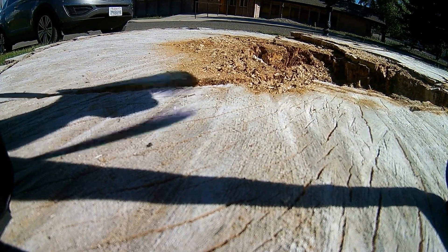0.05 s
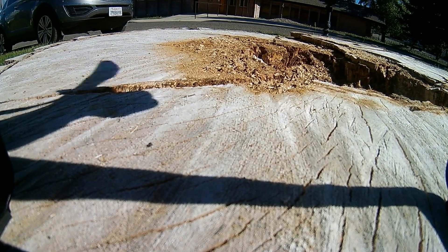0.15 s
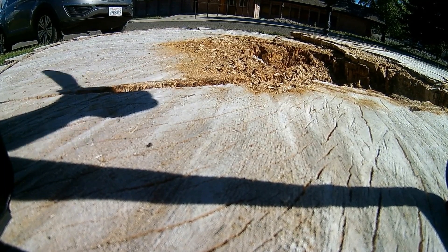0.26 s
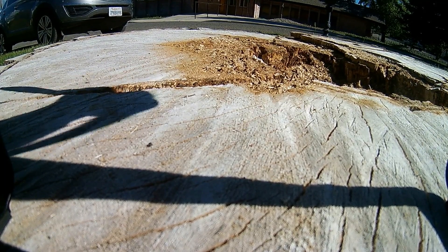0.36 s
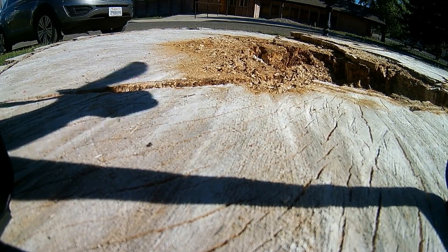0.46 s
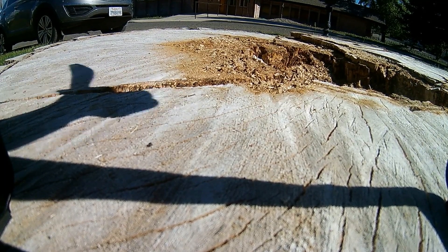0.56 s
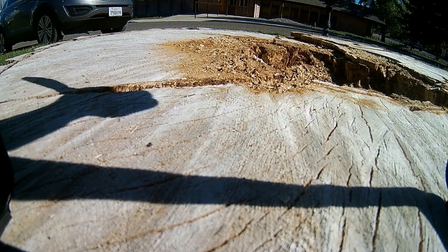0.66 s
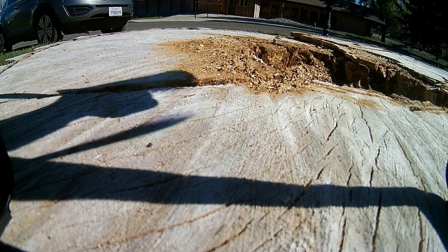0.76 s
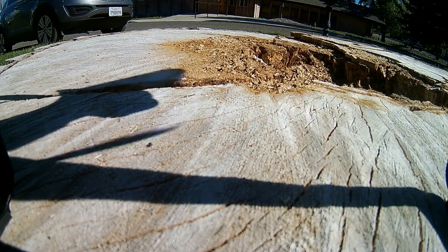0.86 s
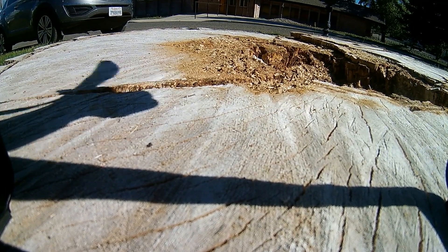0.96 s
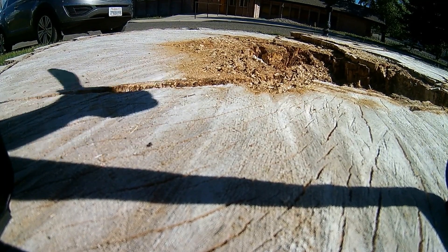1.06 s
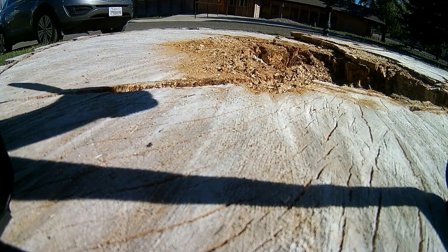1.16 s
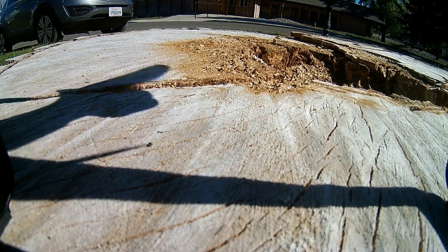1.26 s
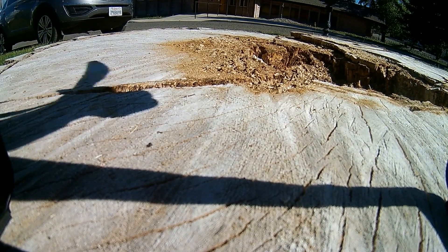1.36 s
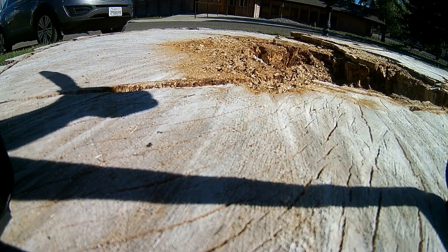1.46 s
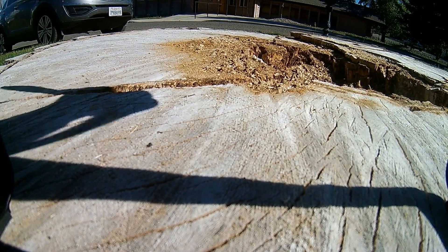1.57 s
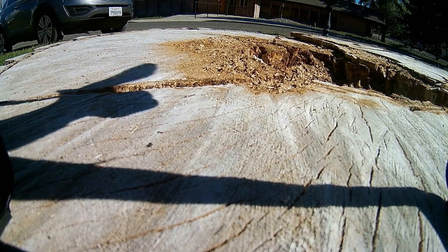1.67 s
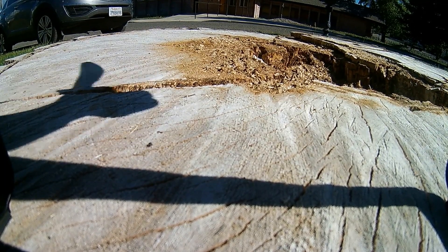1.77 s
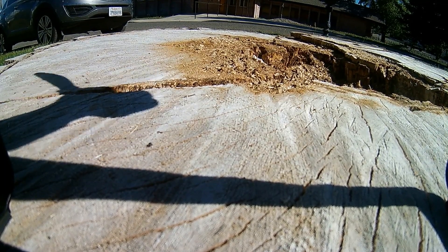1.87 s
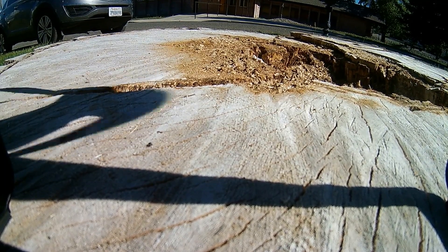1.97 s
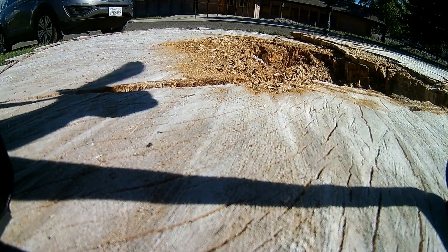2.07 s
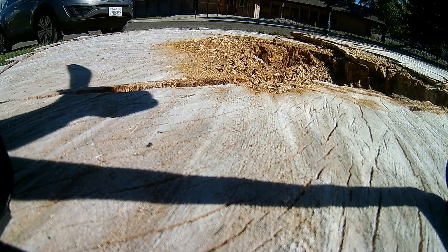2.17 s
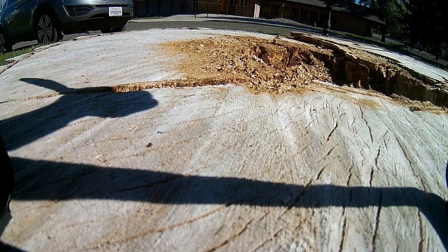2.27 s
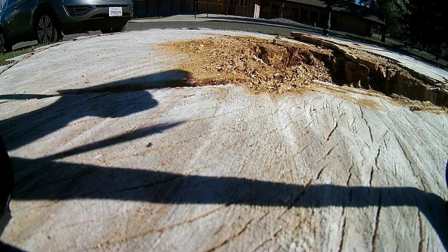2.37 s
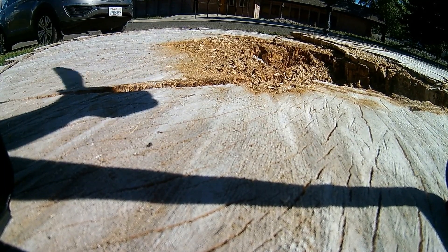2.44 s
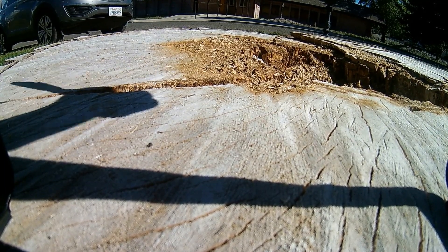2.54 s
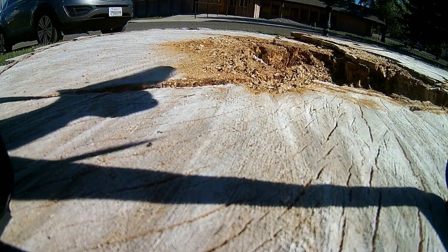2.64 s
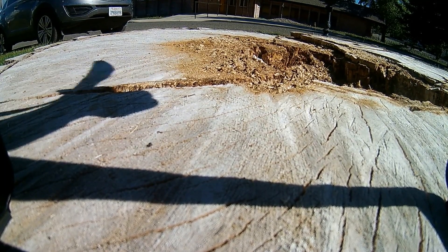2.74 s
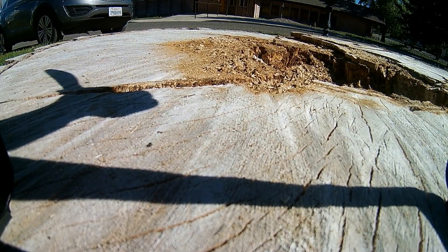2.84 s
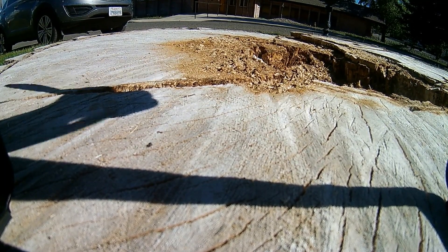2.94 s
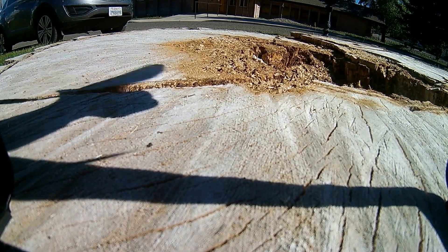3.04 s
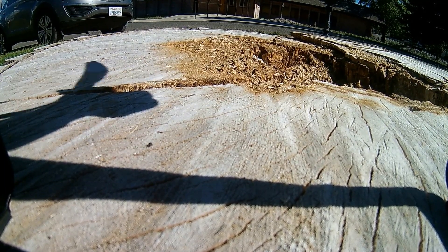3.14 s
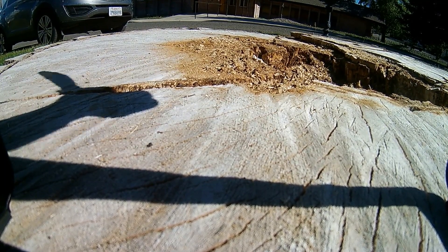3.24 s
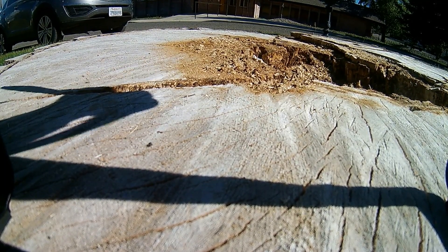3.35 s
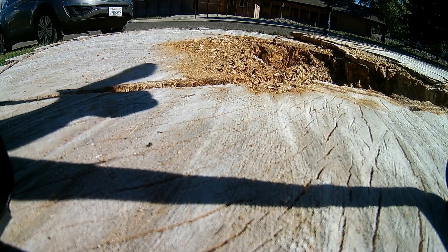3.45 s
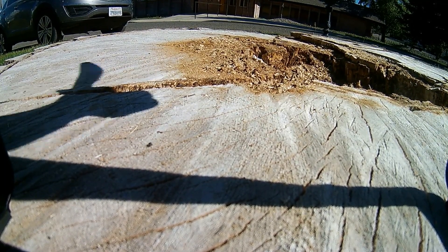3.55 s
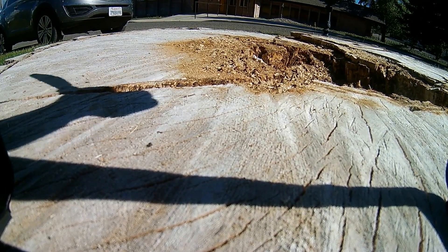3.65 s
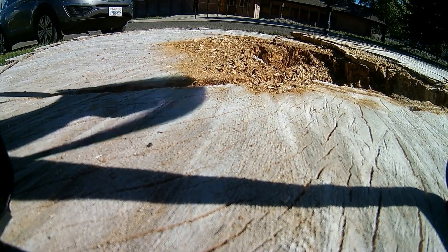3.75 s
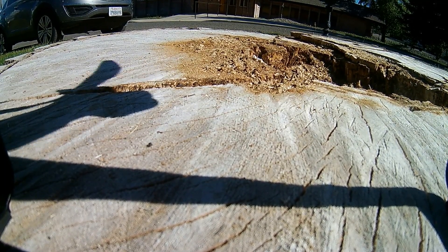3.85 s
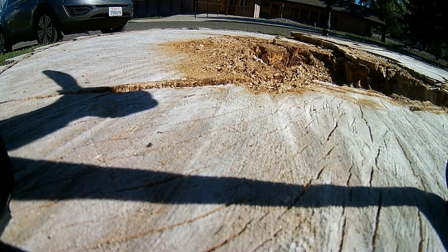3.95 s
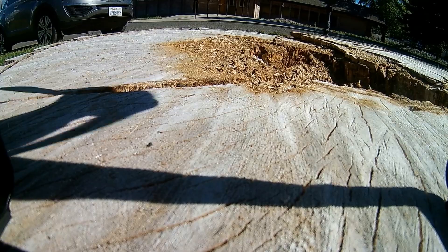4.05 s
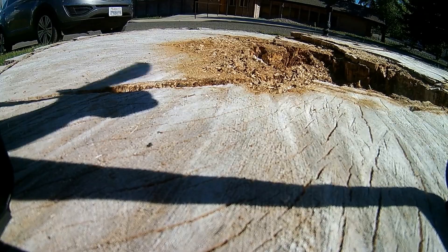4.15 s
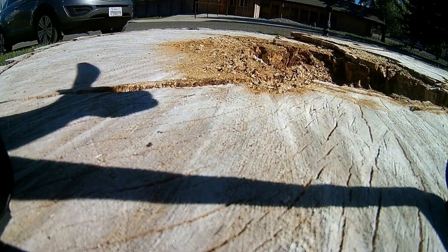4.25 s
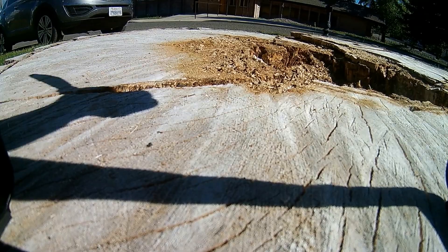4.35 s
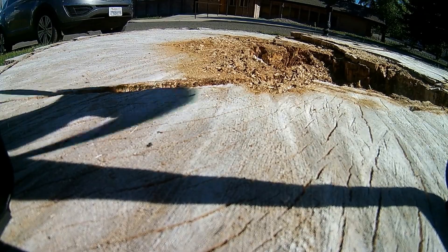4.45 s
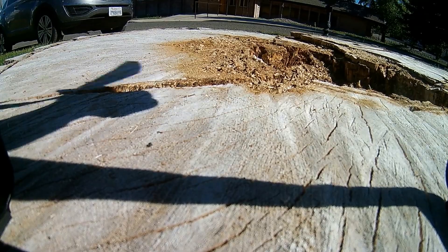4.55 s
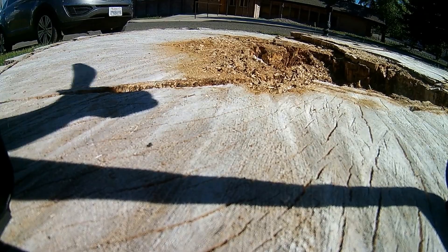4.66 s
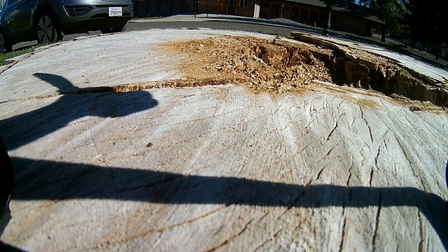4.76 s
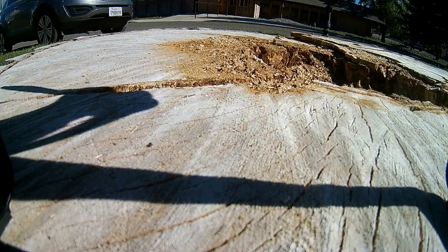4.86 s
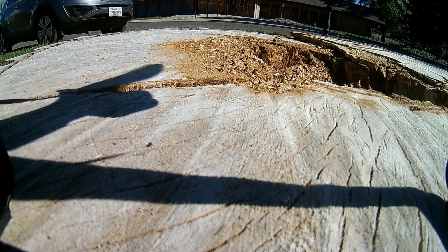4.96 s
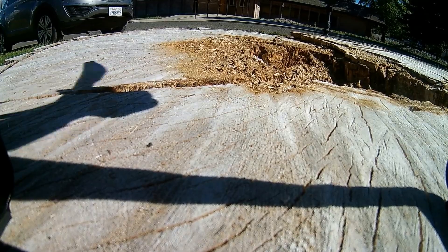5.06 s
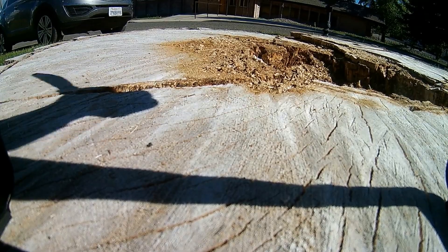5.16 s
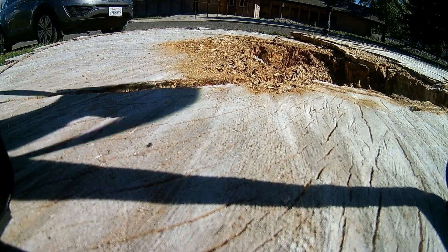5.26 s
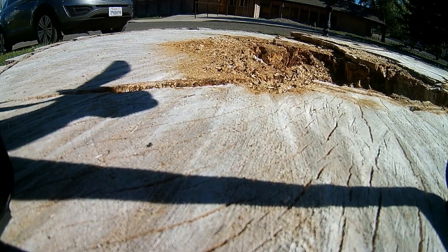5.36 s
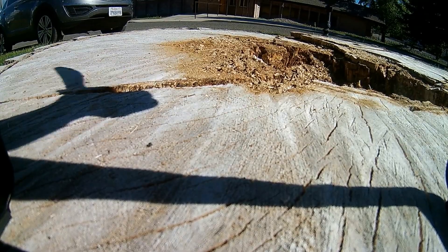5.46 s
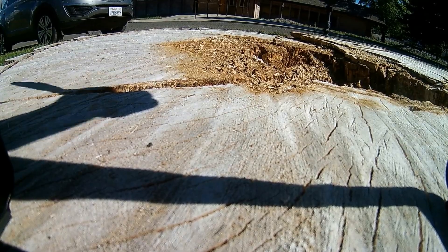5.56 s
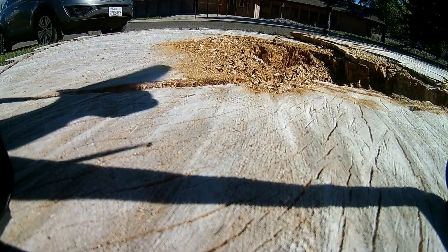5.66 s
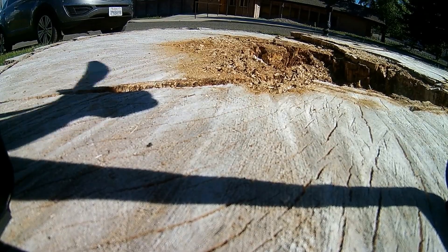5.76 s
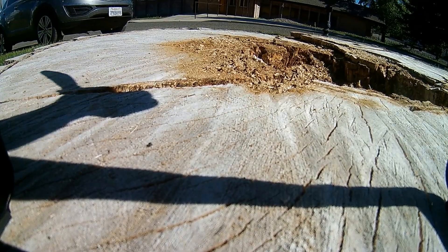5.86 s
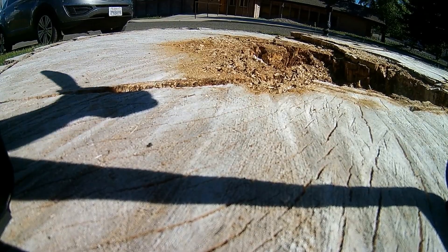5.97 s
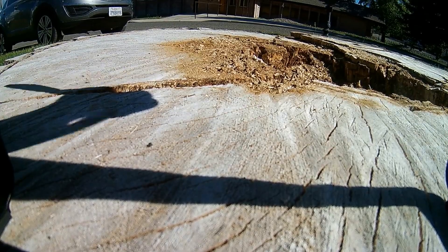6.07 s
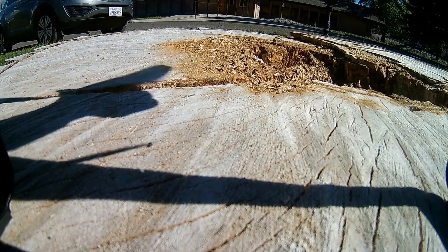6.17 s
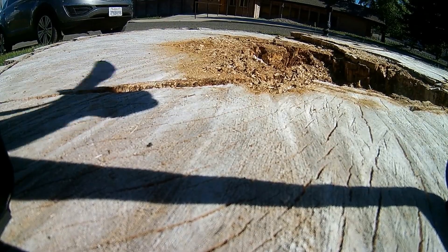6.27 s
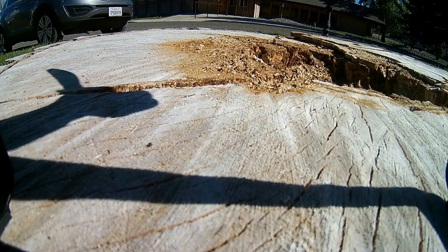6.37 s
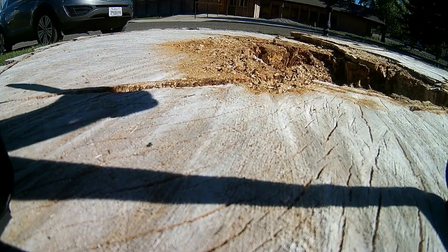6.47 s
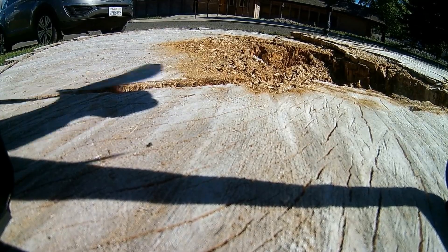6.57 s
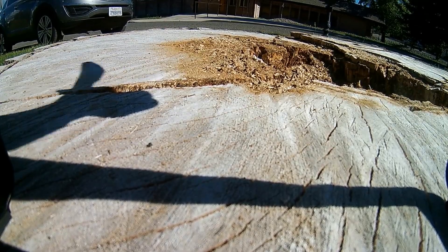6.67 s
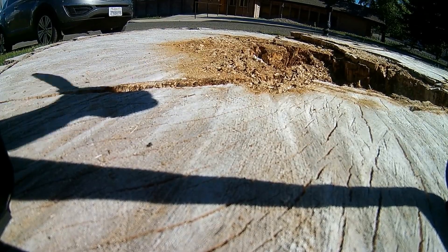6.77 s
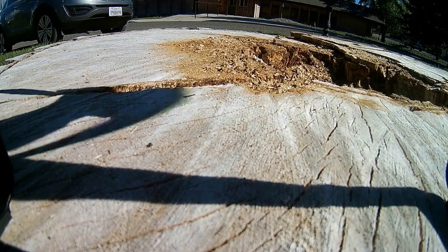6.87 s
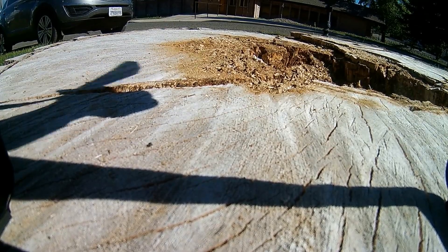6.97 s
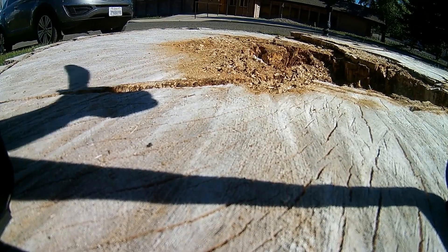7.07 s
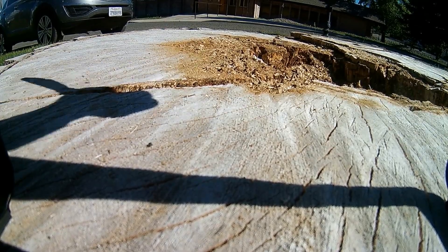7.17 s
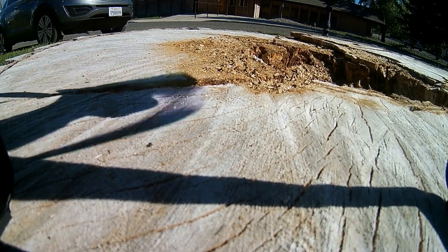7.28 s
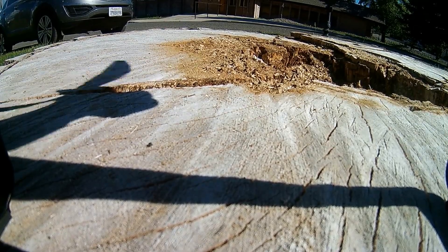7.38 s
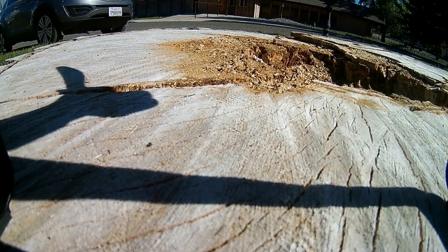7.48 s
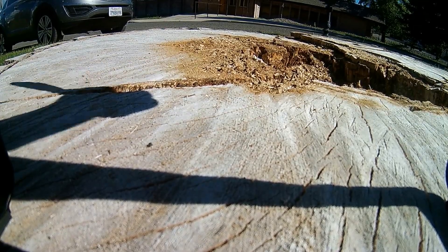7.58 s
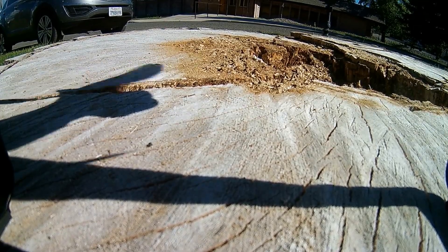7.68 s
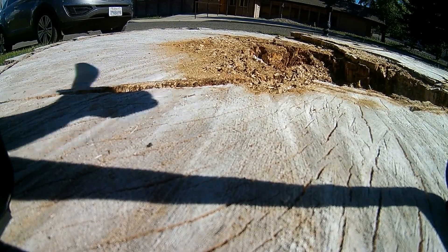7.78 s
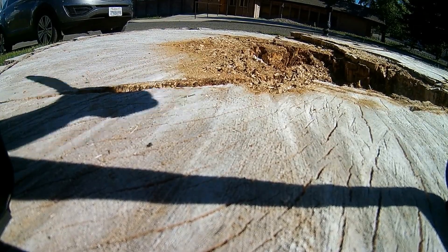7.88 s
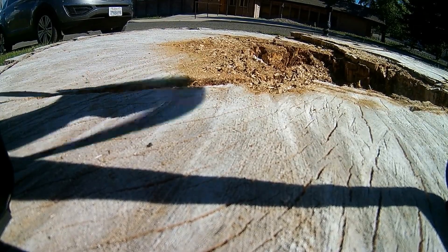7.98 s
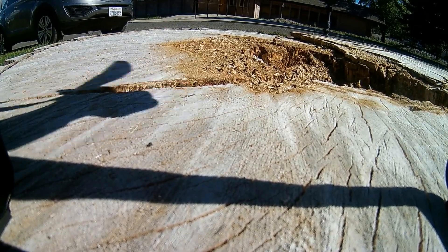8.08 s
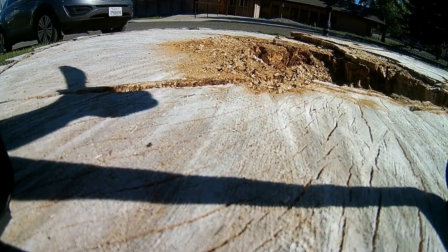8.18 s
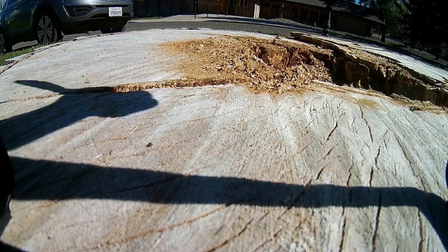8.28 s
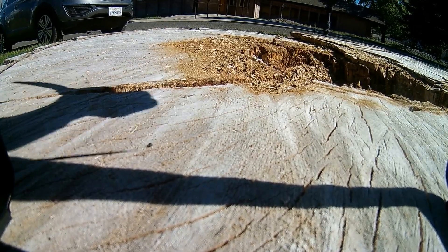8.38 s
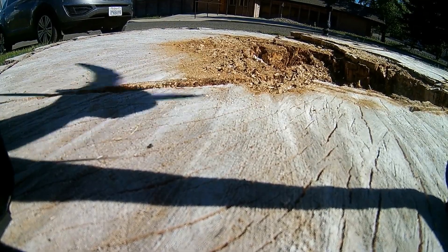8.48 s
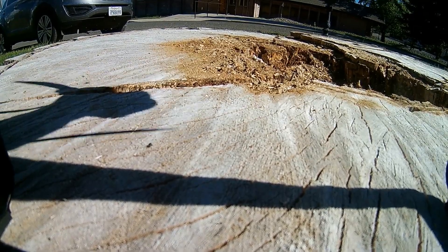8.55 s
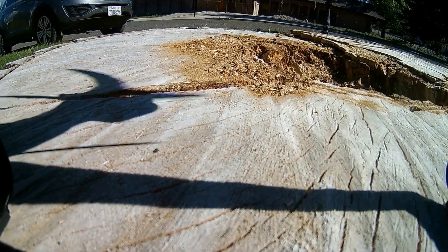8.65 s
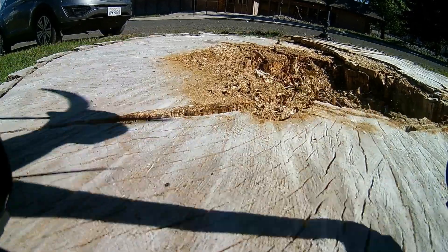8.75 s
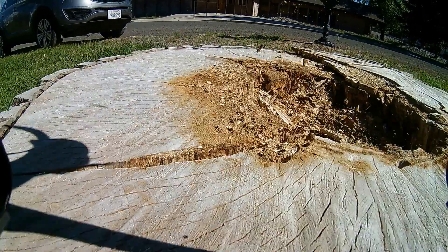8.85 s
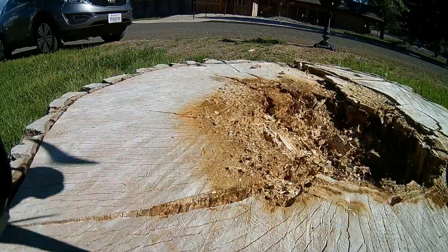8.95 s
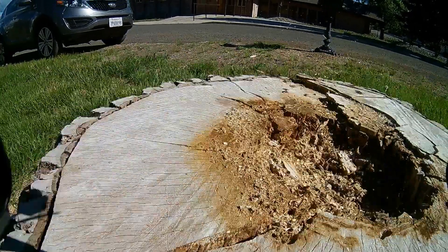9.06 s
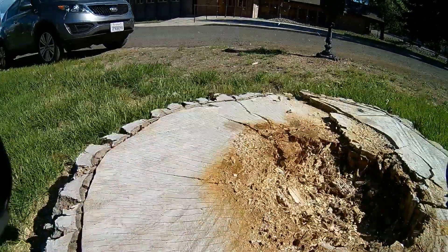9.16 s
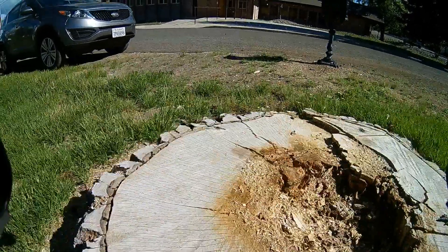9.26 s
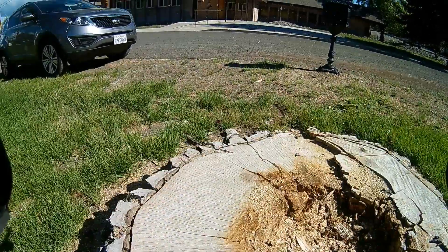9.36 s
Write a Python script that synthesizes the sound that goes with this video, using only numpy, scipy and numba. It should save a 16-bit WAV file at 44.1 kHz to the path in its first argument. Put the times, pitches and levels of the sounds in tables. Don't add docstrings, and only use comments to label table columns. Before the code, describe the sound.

Slow rotors and a cooling fan hum tonally for eight seconds, loose plastic ticking, before the throttle opens into a harsh overloaded roar.

```python
import sys
import numpy as np
from scipy import signal
from scipy.fft import rfft, irfft, next_fast_len
from scipy.io import wavfile
from scipy.ndimage import uniform_filter1d
from numba import njit

SR = 44100
rng = np.random.default_rng(int(sys.argv[2]) if len(sys.argv) > 2 else 0)


def wrap_up_sound(samples):
    columns = np.atleast_2d(samples).T
    tamed = np.clip(columns, -1, 1)
    steps = np.round(tamed * 32767).astype(np.int16)
    wavfile.write(sys.argv[1], SR, steps)


def boost_factor(decibels):
    exponent = np.asarray(decibels, float) / 20
    return 10 ** exponent


N = 415422
t = np.arange(N) / SR

THROTTLE_S = 8.274
FIRST = int(8.2 * SR)
RIPPLES = 21
LAGGING_HZ = 206.1

# [t/s, strongest front rotor tone f/Hz, its level/dB, strongest fan tone f/Hz]
IDLE_DRIFT = [(0.05, 714, -29.5, 1397), (0.12, 715.2, -27, 1394), (0.32, 715, -34, 1396),
              (0.39, 715.8, -28, 1394), (1.15, 713.9, -30.5, 1407), (1.65, 717.7, -27, 1405),
              (2.56, 721.7, -28, 1404), (3.54, 716.3, -26, 1411), (3.7, 716.7, -30.5, 1402),
              (4.0, 716, -30, 1414), (4.5, 718.5, -29, 1394), (5.53, 720.3, -26.5, 1414),
              (5.78, 717.6, -29, 1406), (6.99, 716.4, -29.5, 1421), (7.77, 712.3, -29.5, 1408),
              (8.25, 713.7, -29, 1414)]
# [f/Hz, level/dB]
FRONT_ROTOR = [(51.8, -47.5), (102.7, -44.5), (153.9, -48), (312.5, -53), (358.6, -46), (664, -44.5),
               (692, -37), (742.3, -38), (723.5, -47.5), (717.3, -30.5), (774, -51), (976, -37),
               (1082, -46), (1229, -42), (1583, -49), (1834, -52.5), (1914, -56.5), (2457, -63.5),
               (2148, -49), (2875, -56.5)]
REAR_ROTOR = [(735.6, -41.5), (370.1, -44), (387, -51.5), (793, -51.5), (925, -44), (1005, -47.5),
              (1099, -45), (1290, -50), (1553, -51.5), (1636, -54.5), (1682, -58), (2495, -64.5),
              (2203, -54), (4485, -64), (5240, -64)]
SIDE_ROTOR_TONES = [(346, -50), (640, -55.5), (690, -49), (803, -42.5), (880, -49), (957, -44.5),
                    (1058, -48), (1170, -58.5), (1976, -68.5), (2780, -60), (3951, -66)]
COOLING_FAN = [(904, -40.5), (1034, -36.5), (1265, -44.5), (1410, -38.5), (1790, -52), (2331, -62)]
# [pair (0 leading, 1 lagging), speed ratio, blade tone level/dB, overtone level/dB, whine level/dB]
FLIGHT_ROTORS = [(0, 1, -1.5, -3.5, 4), (0, .977, -11, -7, 3), (1, 1, -9, 0, -3), (1, 1.012, -15, -5, -8)]
# [multiple of the blade rate, level/dB]
BLADE_TONES = [(.5, -14.5), (1, 0.5), (2, -5.5), (3, -6), (3.5, -13.5), (4, -7.5), (5, -12.5), (5.5, -16.5),
               (6, -10), (7, -7.5), (8, -18.5), (9, -16.5), (10, -14.5)]
# [delay t/s, jerk f/Hz, jerk t/s, pull f/Hz, pull t/s]
PAIR_SPIN_UP = [(.004, 103, .025, 38, .3), (.007, 85, .022, 62, .29)]
# [t/s, f/Hz]
HOVER_WHINE = [
    (8.62, 4149),
    (8.646, 4210),
    (8.836, 4238),
    (8.968, 4197),
    (9.054, 4263),
    (9.07, 4186),
    (9.42, 4178),
]
# [t/s, blade rate f/Hz, half length t/s]
SPEED_OVERSHOOT = [
    (8.61, 5.02, .04),
]
# [t/s, level/dB, half length t/s]
BLADE_DIPS = [
    (8.61, -7, .06),
    (8.73, -5, .04),
]
# [t/s, level/dB, time to fade by 60 dB t/s]
MOTOR_JOLTS = [
    (8.2768, -14.5, 0.045),
    (8.28, -9, 0.029),
    (8.299, -18, 0.026),
    (8.312, -22.5, 0.02),
    (8.33, -22.5, 0.035),
]
# [t/s, level over the ring/dB, half length t/s]
FRAME_SHAKES = [
    (8.315, 19, .01),
    (8.336, 17.5, .008),
    (8.355, 14, .012),
    (8.392, 16, .028),
    (8.72, 9, .03),
]
# [t/s, level/dB]
WASH_BUFFET = [
    (8.3, -32),
    (8.39, -27.5),
    (8.44, -13),
    (8.58, -13.5),
    (8.86, -15),
    (9.01, -23),
    (9.08, -19.5),
    (9.23, -31),
    (9.42, -26),
]
# [t/s, level over the hiss/dB, half length t/s]
TIP_BLASTS = [
    (8.63, 0.5, 0.046),
    (8.99, 3.5, .03),
    (9.12, 5, 0.076),
    (9.22, 4, .006),
]
# [f/Hz, level per Hz/dB]
ROTOR_HISS = [(88, -44), (150, -12.5), (209, -5), (339, -22.5), (404, -7.5), (530, -15), (1090, -6),
              (2980, -20.5), (4220, -25.5), (15500, -55)]
# [t/s, knock level/dB, thin ring level/dB, body level/dB]
LOOSE_TICKS = [(.0722, -41, -77, -37), (.0993, -29, -71, -32), (.110, -29, -65, -30), (.378, -27, -54, -35),
               (0.3997, -39, -69, -37), (0.4623, -29.5, -67, -42), (.613, -31, -61, -28),
               (0.888, -35, -63, -28), (.9328, -36, -64, -40), (1.624, -41, -60, -40),
               (2.2852, -38, -69, -36), (2.3374, -41, -69, -38), (2.5242, -25.5, -67, -39),
               (2.7561, -38, -69, -33), (2.8075, -34, -70, -41), (2.829, -37, -68, -44),
               (2.875, -38, -76, -36), (3.1508, -23, -53, -19), (3.5039, -42, -69, -38),
               (3.6556, -32, -63, -26), (3.9816, -41, -64, -33), (4.0074, -34, -65, -36),
               (4.8337, -27, -71, -38), (4.9447, -32, -63, -40), (6.2716, -36, -64, -38),
               (6.6298, -40, -72, -37), (6.685, -38, -64, -38), (6.8922, -37, -78, -37),
               (6.995, -37, -75, -33), (7.2918, -42, -77, -34)]
# [t/s, thin ring level/dB]
LIGHT_TOUCHES = [(.2433, -70), (2.3074, -67), (2.787, -73), (3.0385, -67), (3.2544, -69), (4.4872, -69),
                 (4.669, -67), (5.138, -74), (8.0735, -72)]
# [f/Hz, level/dB, time to fade by 60 dB t/s, level column (0 knock, 1 thin ring, 2 body)]
TICK_RINGS = [(11150, 9, 0.032, 1), (11500, 5, .022, 1), (7400, 7.5, .008, 1), (1774, 1, 0.025, 2),
              (1847, -4.5, 0.023, 2), (4800, -15, 0.019, 0)]
# [f/Hz, level per Hz/dB]
SHELL_RUMBLE = [(12, -44.5), (20, -14), (92, -12), (252, -13), (362, -11.5), (581, -12.5), (725, -7.5),
                (834, -9.5), (1010, -11), (1410, -12), (1720, -18.5), (2210, -24), (2610, -29.5),
                (5230, -41.5), (15500, -94)]
# [f/Hz, width f/Hz, level over the rumble/dB]
SHELL_PEAKS = [(355.5, 55, 4.5), (702, 84, 4.5), (854, 34, -3.5), (998, 204, 5.5), (1335, 90, -10),
               (1715, 60, -6), (1810, 100, 1), (2030, 55, -2), (2150, 78, 7), (2650, 130, -7),
               (2740, 190, 5), (2890, 33, -7.5), (3300, 200, -6), (4030, 810, 5), (4480, 94, 3.5),
               (5200, 110, 11.5)]
# [f/Hz, level per Hz/dB]
MICROPHONE_HISS = [(4500, -10), (6300, 0), (8000, -1.5), (10000, -4), (13000, -5.5), (15500, -8)]
# [t/s, level over the steady breeze/dB]
BREEZE_PUFFS = [
    (0.0, 8.5),
    (.78, 7),
    (.96, 5),
    (2.2, 5.5),
    (3.2, 6),
    (4.5, 3),
    (5.6, 6.5),
    (5.76, 12.5),
    (5.93, 10),
    (6.1, 4),
]


def level(x, db):
    return x * boost_factor(db) / np.sqrt(np.mean(x ** 2))


def walk(rate, size=N):
    k = int(SR / rate)
    held = np.repeat(rng.standard_normal(size // k + 1), k)
    return 1.3 * uniform_filter1d(uniform_filter1d(held, k), k)[:size]


def swells(rows, now):
    return sum(height * np.exp(-((now - s) / half) ** 2) for s, height, half in rows)


def coloured(points, modes=(), size=N):
    hz, db = np.transpose(points)
    length = next_fast_len(size)
    bins = np.maximum(np.fft.rfftfreq(length, 1 / SR), 1)
    shape = np.interp(np.log(bins), np.log(hz), db)
    shape = shape + sum(d * np.exp(-2 * ((bins - f) / w) ** 2) for f, w, d in modes)
    spectrum = rfft(rng.standard_normal(size), length) * boost_factor(shape)
    return level(irfft(spectrum, length)[:size], 0)


def resonances(x, *modes):
    for hz, width in modes:
        x = signal.lfilter(*signal.iirpeak(hz, hz / width, fs=SR), x)
    return x


@njit
def partials(turn, hz, start, gain, step):
    out = np.zeros(len(turn))
    for k in range(len(hz)):
        for j in range((len(turn) - 1) // step):
            arrow = np.exp(1j * (hz[k] * turn[j * step] + start[k]))
            spin = np.exp(1j * hz[k] * (turn[(j + 1) * step] - turn[j * step]) / step)
            g, slope = gain[k, j], (gain[k, j + 1] - gain[k, j]) / step
            for i in range(j * step, (j + 1) * step):
                out[i] += g * arrow.imag
                arrow, g = arrow * spin, g + slope
    return out


def tones(table, speed, flicker_db, flicker_rate):
    step = 32
    hz, db = np.array(table, float).T.copy()
    turn = 2 * np.pi * np.cumsum(np.pad(speed, (0, step + 1), "edge")) / SR
    points = len(turn) // step + 2
    gain = np.array([boost_factor(d + 3.5 + flicker_db * walk(step * flicker_rate, size=points)) for d in db])
    start = rng.uniform(0, 2 * np.pi, len(hz))
    return partials(turn, hz, start, gain, step)[:len(speed)]


def idle_rotors_and_fan():
    s, *columns = np.transpose(IDLE_DRIFT)
    front_hz, swell_db, fan_hz = [np.interp(t, s, c) for c in columns]
    swell_db = swell_db + 1.5 * walk(5)
    swell = boost_factor(swell_db - swell_db.mean())
    rotors = tones(FRONT_ROTOR, front_hz / front_hz.mean() + 0.00199 * walk(30), 1.3, 20)
    rotors += tones(REAR_ROTOR, 1 + .004 * walk(3) + 0.00202 * walk(14), 2.5, 25)
    rotors += tones(SIDE_ROTOR_TONES, 1 + .004 * walk(3) + .002 * walk(14), 2.5, 25)
    fan = tones(COOLING_FAN, fan_hz / fan_hz.mean() + 0.0011 * walk(12), 0.48, 15)
    return swell ** 0.73 * rotors + fan


def rotor_speeds(now):
    leading = np.interp(now, *np.transpose(HOVER_WHINE)) / RIPPLES
    lagging = LAGGING_HZ + swells(SPEED_OVERSHOOT, now)
    pairs = []
    for top, (delay, jerk, quick, pull, slow) in zip((leading, lagging), PAIR_SPIN_UP):
        age = np.maximum(now - THROTTLE_S - delay, 0)
        pairs.append(top - jerk * np.exp(-age / quick) - pull * np.maximum(1 - age / slow, 0))
    return pairs


def flight_rotors(now, pairs):
    size = len(now)
    unsteady = .005 + .02 * np.exp(-np.maximum(now - THROTTLE_S, 0) / .1)
    blades, overtones, whine, chop = np.zeros((4, size))
    for pair, ratio, tone_db, share_db, whine_share_db in FLIGHT_ROTORS:
        hz = ratio * pairs[round(pair)] * (1 + .003 * walk(25, size=size))
        rough_hz = hz * (1 + 0.0043 * walk(60, size=size))
        whine_hz = hz * (1 + unsteady * walk(300, size=size))
        blades += boost_factor(tone_db) * tones(BLADE_TONES[:2], hz, 1.1, 30)
        overtones += boost_factor(share_db) * tones(BLADE_TONES[2:], rough_hz, 2.6, 35)
        whine += boost_factor(whine_share_db) * tones([(RIPPLES, 1.5)], whine_hz, 3.3, 110)
        chop += np.cos(2 * np.pi * np.cumsum(hz) / SR)
    return blades, overtones, whine, chop


def motor_bite(now, leading_hz):
    start_s, length_s = 8.2786, .009
    gate = np.clip(np.minimum(now - start_s, start_s + length_s - now) / .0008 + .5, 0, 1)
    return boost_factor(2) * gate * np.sin(2 * np.pi * RIPPLES * np.cumsum(leading_hz) / SR)


def motor_jolts(now):
    noise = resonances(rng.standard_normal(len(now)), (1500, 1800), (2000, 5000))
    fades = sum(boost_factor(db - 60 * np.maximum(now - s, 0) / t60) * (now > s) for s, db, t60 in MOTOR_JOLTS)
    return fades * level(noise, 0)


def frame_ring(now, climb):
    hz = 1135 - 50 * climb - (1135 - 874) * np.exp(-np.maximum(now - 8.3, 0) / .05)
    slow = rng.standard_normal((2, len(now)))
    slow = uniform_filter1d(uniform_filter1d(slow, size=220), size=220)
    turn = 2 * np.pi * np.cumsum(hz) / SR
    ring = slow[0] * np.cos(turn) + slow[1] * np.sin(turn)
    ring_db = -30 + 12.5 * climb + swells(FRAME_SHAKES, now)
    return boost_factor(ring_db) * level(ring, -1.5)


def rotor_wash(now):
    wash = resonances(rng.standard_normal(len(now)), (70, 110), (75, 150))
    wash = wash * boost_factor(2.3 * walk(23, size=len(now)))
    return boost_factor(np.interp(now, *np.transpose(WASH_BUFFET))) * level(wash, 2.16)


def rotor_hiss(now, chop):
    hiss = coloured(ROTOR_HISS, size=len(now)) * (1 + .12 * chop)
    hiss = hiss * boost_factor(1.8 * walk(200, size=len(now)) + swells(TIP_BLASTS, now))
    return level(hiss, 9.0)


def flight():
    now = t[FIRST:]
    age = now - THROTTLE_S
    pairs = rotor_speeds(now)
    blades, overtones, whine, chop = flight_rotors(now, pairs)
    climb = np.clip((now - 8.75) / .45, 0, 1)
    octaves = np.log2(pairs[1] / LAGGING_HZ)
    blade_db = -22 + 4 * climb + 28.5 * octaves
    overtone_db = -23 + 0.7 * climb + 4.5 * octaves
    hiss_db = -27.5 - 0.3 * climb + 3 * octaves
    drive_db = 8.5 - 4 * climb - 1.5 * octaves
    whine_db = -41 + 5.5 * climb + 19 * np.exp(-np.maximum(age, 0) / .075)
    air = rotor_wash(now) + boost_factor(blade_db + swells(BLADE_DIPS, now)) * blades
    air = air + boost_factor(overtone_db + 1.0) * overtones
    air = air + frame_ring(now, climb) + boost_factor(hiss_db) * rotor_hiss(now, chop)
    drive = boost_factor(drive_db * np.clip(age / 0.24, .2, 1))
    air = air * np.clip(age / 0.041, 0, 1)
    whine = boost_factor(whine_db - 5.5) * whine * np.clip(age / .008, 0, 1)
    sound = drive * (air + whine) + motor_jolts(now) + motor_bite(now, pairs[0])
    return np.pad(sound, (FIRST, 0))


def loose_part_ticks():
    out, age = np.zeros(N), t[:3000]
    rise = np.sin(np.pi / 2 * np.minimum(age / .0018, 1)) ** 2
    faint_db = -41.5
    rows = LOOSE_TICKS + [(s, faint_db, db, faint_db) for s, db in LIGHT_TOUCHES]
    grit = resonances(rng.standard_normal(N), (4000, 1600), (4200, 1600), (4100, 2400))
    grit = level(grit, -6.5)
    for (s, *db), (pitch, *chance) in zip(rows, rng.standard_normal((len(rows), 10))):
        at = int(s * SR)
        spot = slice(at, at + len(age))
        out[spot] += rise * boost_factor(db[0] - 60 * age / 0.013) * grit[spot]
        hz = 3816 * (1 + .012 * pitch)
        modes = [(hz, 1.1, .02, 0), (hz * 1.04, -3, .02, 0), (hz * .96, -4, .02, 0)] + TICK_RINGS
        for (f, mode_db, t60, column), x in zip(modes, chance):
            fade = boost_factor(db[round(column)] + mode_db - 60 * age / t60)
            out[spot] += rise * fade * np.sin(2 * np.pi * f * (1 + 0.011 * x) * age)
    return out


def shell_air():
    rumble = boost_factor(-29.5) * coloured(SHELL_RUMBLE, SHELL_PEAKS)
    return rumble + boost_factor(-67.5) * coloured(MICROPHONE_HISS)


def breeze():
    puffs_db = swells([(s, db, 0.093) for s, db in BREEZE_PUFFS], t)
    breeze_db = -39 + 3.8 * walk(3.6) + puffs_db + 1.8 * walk(12)
    rumble = resonances(rng.standard_normal(N), (45, 63), (50, 130), (60, 200))
    return level(rumble, -3.5) * boost_factor(breeze_db)


def scene():
    idling = np.clip((THROTTLE_S + 0.035 - t) / 0.014, 0, 1)
    idle = idle_rotors_and_fan() + shell_air() + breeze()
    return (idling * idle + flight() + loose_part_ticks())[None]


def top_cut(x):
    return signal.sosfilt(signal.butter(12, 15740, fs=SR, output="sos"), x)


def record(dry):
    x = np.clip(dry, -.72, .72)
    keep = np.exp(-1 / (.025 * SR))
    power = signal.lfilter([(1 - keep) ** 2], [1, -2 * keep, keep ** 2], x ** 2)
    x = x * np.minimum(1, boost_factor(-14.0 + .8 * walk(28)) / np.sqrt(power + 1e-9))
    x = signal.lfilter(*signal.butter(1, 13, "high", fs=SR), x)
    x = signal.lfilter(*signal.butter(1, 13000, fs=SR), x)
    return top_cut(x)


dry = scene()
out = record(dry)
wrap_up_sound(out)
```